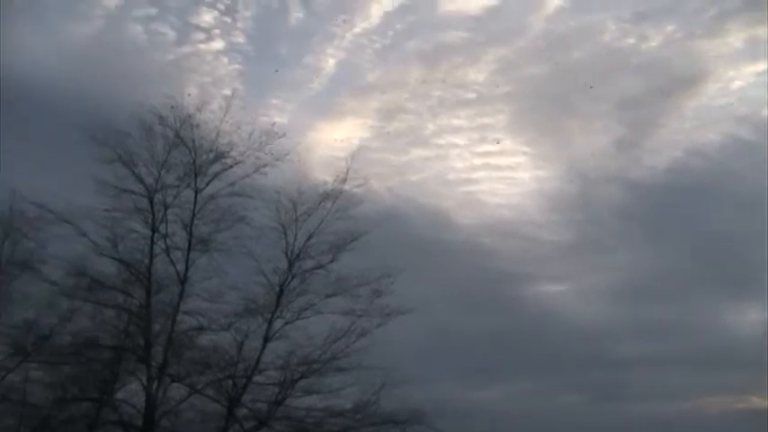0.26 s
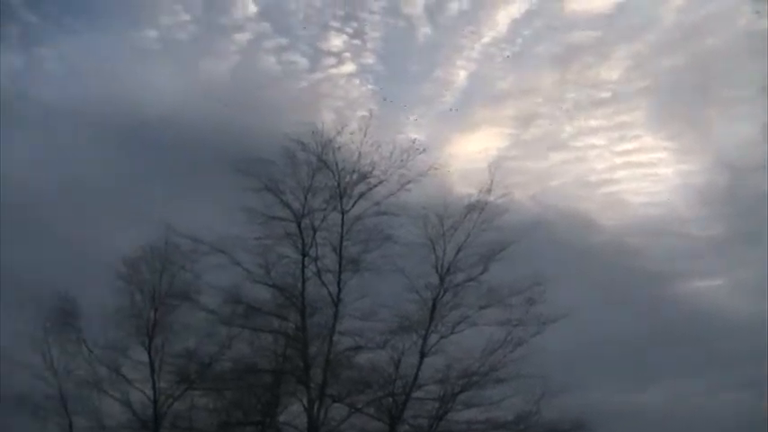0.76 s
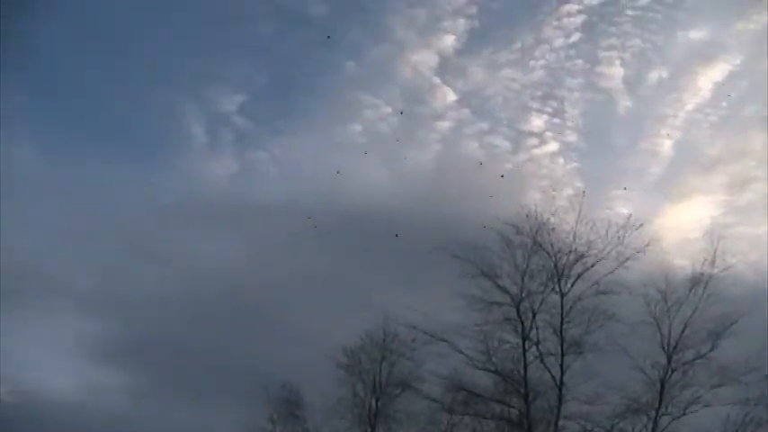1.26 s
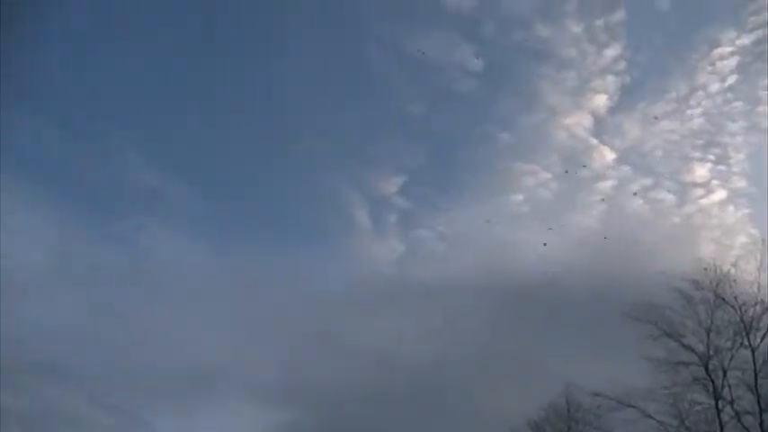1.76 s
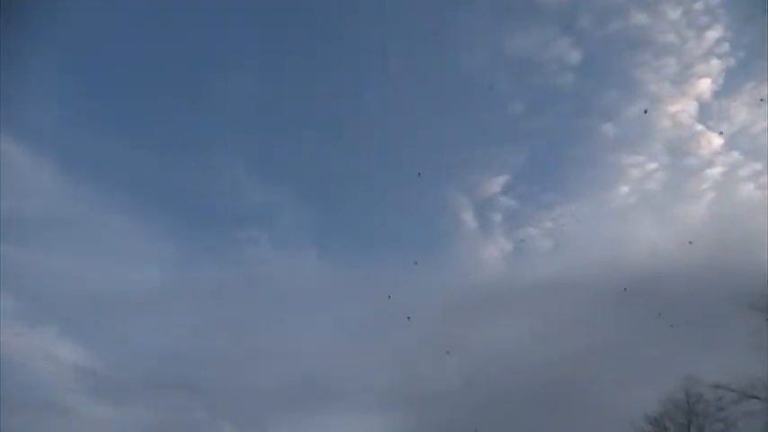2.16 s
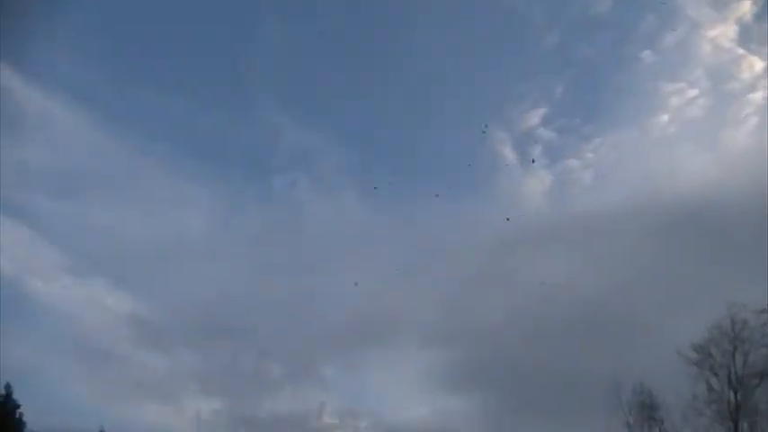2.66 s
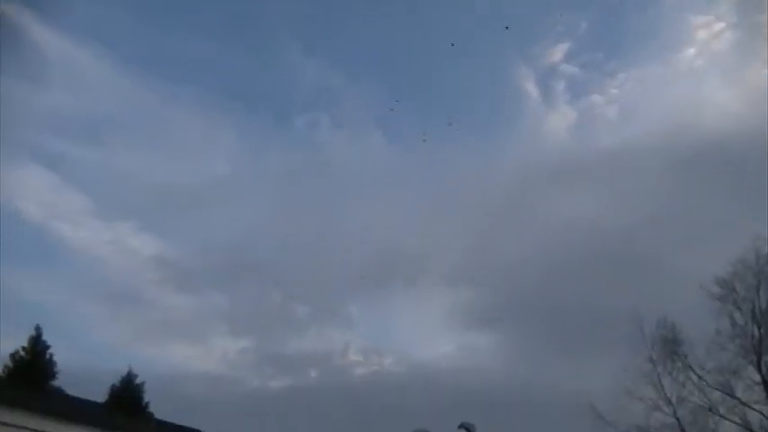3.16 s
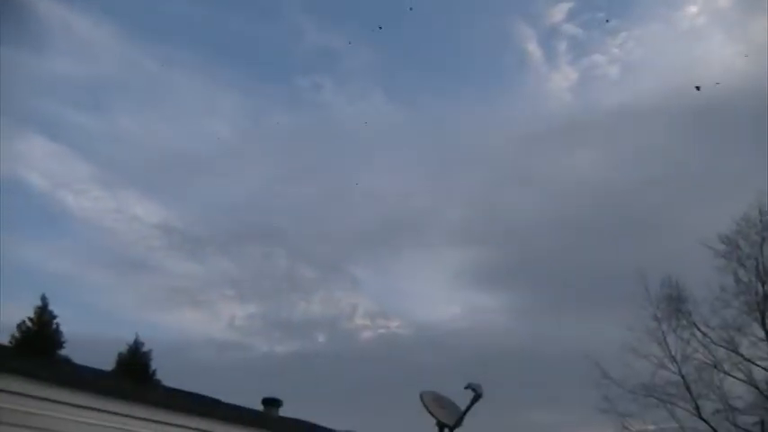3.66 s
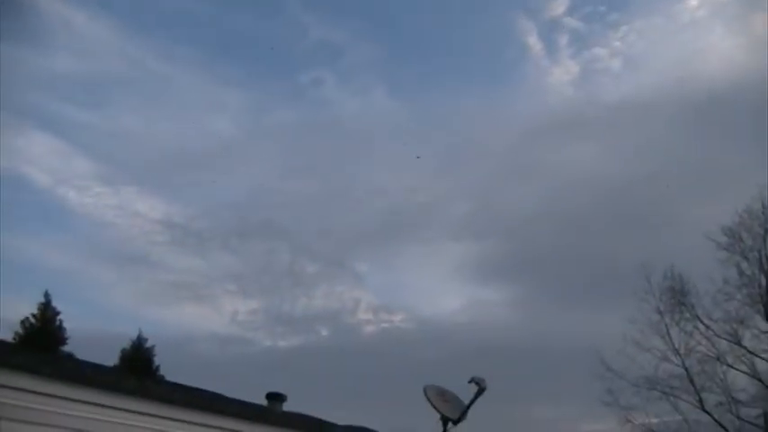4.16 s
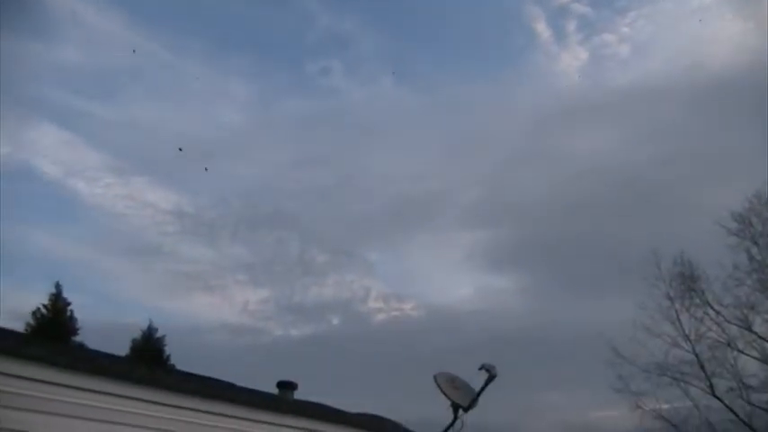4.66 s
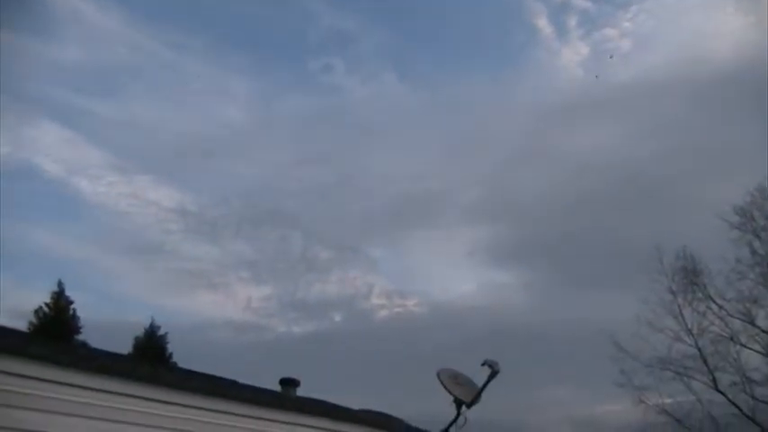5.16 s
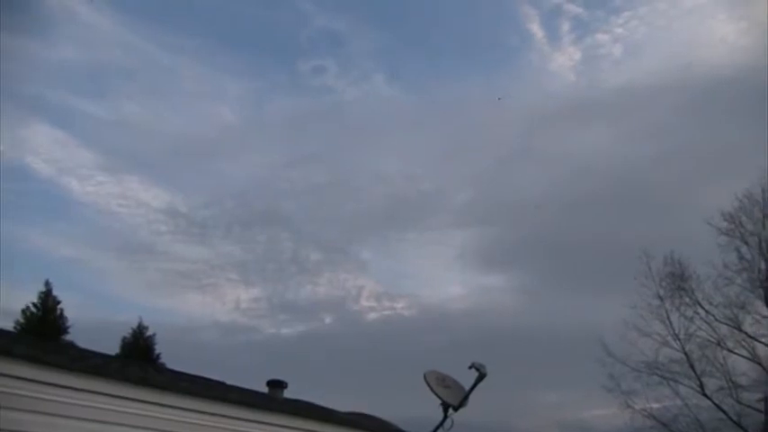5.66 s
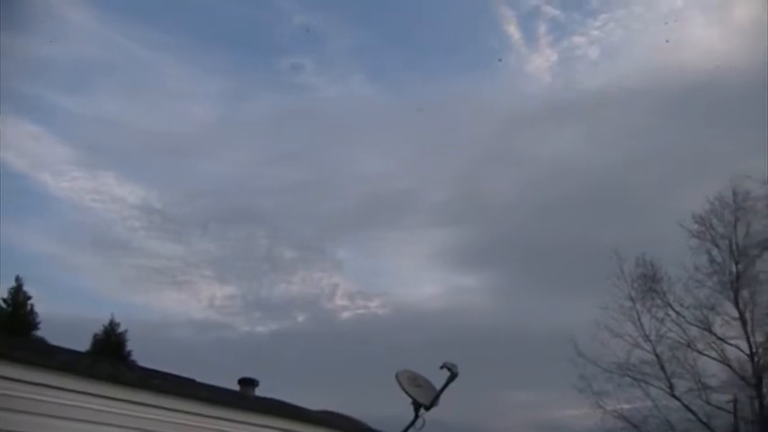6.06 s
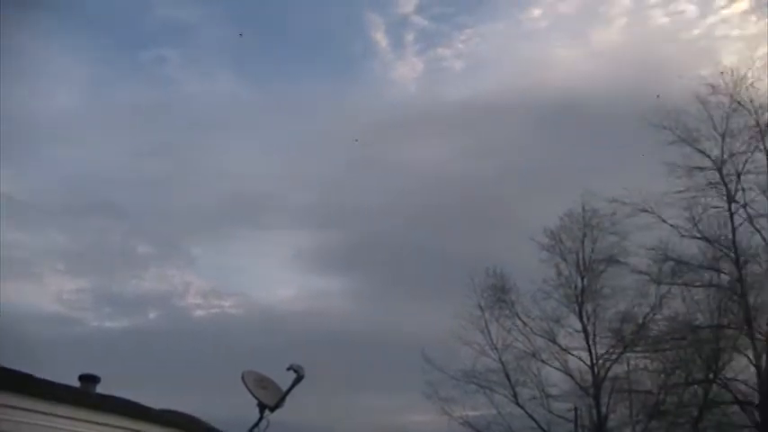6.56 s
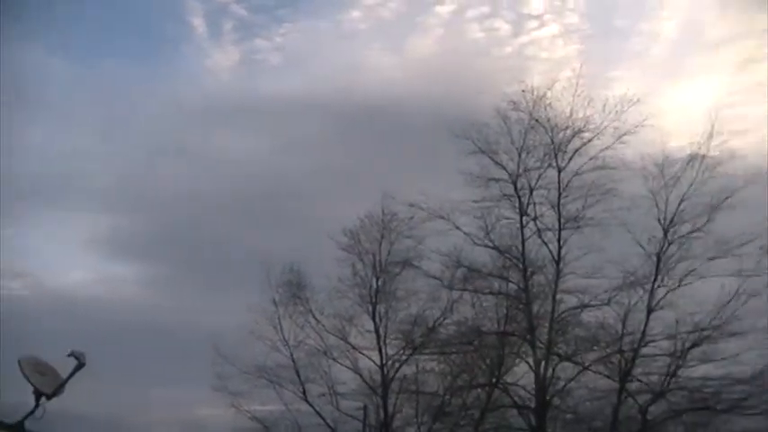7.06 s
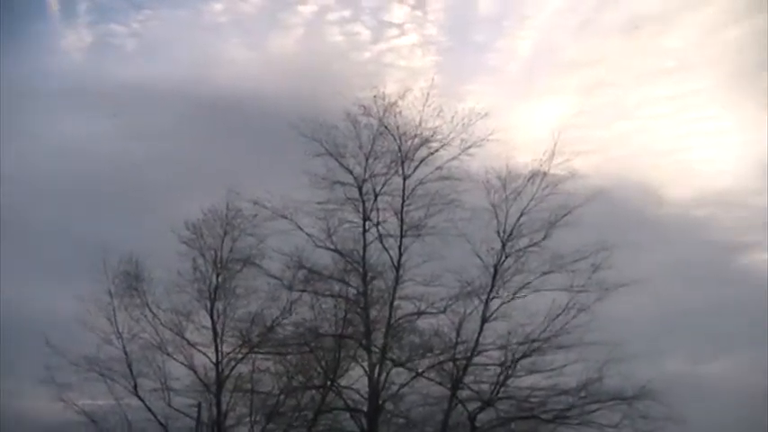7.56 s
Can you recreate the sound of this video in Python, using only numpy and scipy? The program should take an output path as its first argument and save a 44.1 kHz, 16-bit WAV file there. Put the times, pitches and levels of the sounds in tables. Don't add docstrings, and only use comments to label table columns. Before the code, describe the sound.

A big flock of small birds passes over gardens at dusk, already in full chatter. Distant voices blur into a constant bright bed, while nearer birds give quick sliding whistles and dry, throaty chacks on both sides. Breeze rustles low in a small stereo camera microphone; a faint engine drones by early. Hard gusts thud just after three seconds, then the wind eases and the birds continue to the end.

```python
import sys
import numpy as np
from scipy import signal
from scipy.io import wavfile

SR = 44100
rng = np.random.default_rng(int(sys.argv[2]) if len(sys.argv) > 2 else 0)


def store_pcm(level_fs):
    pcm = np.round(np.clip(level_fs, -1, 1) * 32767).astype(np.int16)
    wavfile.write(sys.argv[1], SR, np.atleast_2d(pcm).T)


def rack_gain(trim_db):
    fader = np.asarray(trim_db, float)
    return 10 ** (fader / 20)


N = 343977


def in_time(rows):
    s, *columns = np.transpose(rows)
    return [np.interp(np.arange(N) / SR, s, column) for column in columns]


def at_hz(points, hz):
    table_hz, values = np.transpose(points)
    return np.interp(np.log(hz), np.log(table_hz), values)


def rms_one(x):
    return x / np.sqrt(np.mean(x ** 2) + 1e-20)


def drift(rate_hz):
    r = np.exp(-40 * np.pi * rate_hz / SR)
    sparse = rng.standard_normal(N // 20 + 2002)
    slow = signal.lfilter([1], [1, -2 * r, r * r], sparse)[2000:]
    return np.interp(np.arange(N) / 20, np.arange(len(slow)), rms_one(slow))


def resonate(x, hz, width_hz):
    r = np.exp(-np.pi * width_hz / SR)
    poles = [1, -2 * r * np.cos(2 * np.pi * hz / SR), r * r]
    return signal.lfilter(np.array([1, 0, -1]) * (1 - r * r) / 2, poles, x)


def resonate_twice(x, hz, width_hz):
    return resonate(resonate(x, hz, width_hz), hz, width_hz)


def band_pass(x, low_hz, high_hz):
    return signal.sosfilt(signal.butter(2, [low_hz, high_hz], "band", fs=SR, output="sos"), x)


def add(out, s, sound, pan_db):
    lag = round(np.clip(pan_db / 4, -2, 2))
    for channel, side in enumerate((1, -1)):
        at = max(round(s * SR) + max(-side * lag, 0), 0)
        part = np.atleast_2d(sound)[-channel][:N - at]
        out[channel, at:at + len(part)] += part * rack_gain(side * pan_db / 2)


def bands(spectrum, edges, patchy_db, flicker_hz):
    white = rng.standard_normal((2, 2, N))
    for k, (low, high) in enumerate(zip(edges, edges[1:])):
        hz = np.sqrt(low * high)
        pair = band_pass(white[k % 2], low, high)
        yield hz, pair * rack_gain(at_hz(spectrum, hz) + patchy_db * drift(flicker_hz))


# t/s, level/dB
FLOCK_PASSING = [
    (0.0, -37.5),
    (0.19, -38),
    (0.35, -39),
    (0.89, -37),
    (1.26, -38.5),
    (5.15, -38),
    (5.47, -37),
    (7.47, -37.5),
    (7.8, -37),
]


def flock_loudness():
    return rack_gain(in_time(FLOCK_PASSING)[0])


# f/Hz, level/dB per Hz
CHATTER_COLOUR = [(210, -44), (350, -10), (620, -11.5), (1770, -9.5), (2990, -4), (3860, -0.5),
                  (4890, -4.5), (5830, -15.5), (7880, -26.5), (9690, -36), (11900, -32.5), (15600, -38)]
# f/Hz, likeness (-1 to 1)
PORT_LIKENESS = [(60, -0.36), (130, -0.44), (290, -0.31), (640, -0.29), (1410, 0.56), (3100, 0.42),
                 (6820, -0.24), (15000, 0.54)]


def chatter():
    out = 0
    edges = 330 * 2 ** np.arange(0, 5.8, .4)
    for hz, (mid, side) in bands(CHATTER_COLOUR, edges, patchy_db=2.0, flicker_hz=7.6):
        alike = np.clip(at_hz(PORT_LIKENESS, hz) - .03, -.95, .95)
        out = out + np.sqrt(1 + alike) * mid + np.sqrt(1 - alike) * side * [[1], [-1]]
    return rack_gain(-3.0) * flock_loudness() * rms_one(out)


def sing(s, hz, level_db, overtones, chance):
    breath_blur = .9
    buzz_hz, buzz_depth = 190, 0.45
    top_hz = 15750
    n = np.arange(len(hz))
    warble, flutter, rasp = chance[:, np.minimum(round(s * SR) + n + round(hz[0]), N - 1)]
    shrill = np.clip((hz[-1] - 5800) / 700, 0, 1)
    hz = hz * (1 + (.0065 + .005 * shrill) * warble)
    phase = 2 * np.pi * np.cumsum(hz) / SR
    tone = np.sin(phase)
    for k, db in overtones:
        partial = np.sin(k * phase + breath_blur * rasp)
        tone = tone + rack_gain(db + 2.6 * flutter) * partial * (k * hz < top_hz)
    tone = tone * (1 + buzz_depth * shrill * np.sin(2 * np.pi * buzz_hz * n / SR + warble))
    ends = np.clip(np.minimum(n, n[::-1]) / (0.007 * SR), 0, 1)
    return tone * ends * rack_gain(level_db + 3 + 3.2 * np.tanh(flutter))


# f/Hz, width/Hz, level/dB
THROAT_RESONANCES = [(3030, 2800, 5.5), (3900, 2020, -2.5), (3995, 2360, -3.5), (4100, 1100, -15.5)]
# f/Hz, width/Hz, level/dB
BEAK_RESONANCES = [(6230, 700, 10.5), (8297, 980, 5.5), (11450, 2700, 0.5)]


def chacks(rows, rasp_db, throat_db):
    ragged = rng.standard_normal(N) * rack_gain(2.5 * drift(350))
    throats = [rack_gain(db) * rms_one(resonate_twice(ragged, hz, width)) for hz, width, db in THROAT_RESONANCES]
    low, middle, top = [rack_gain(db) * resonate(ragged, hz, width) for hz, width, db in BEAK_RESONANCES]
    rasp = np.array([low - middle + top, low - middle - top])
    rasp = rms_one(band_pass(rasp, 6000, 12000))
    out, pans = np.zeros((2, N)), rng.normal(0, 2.5, len(rows))
    for k, (s, length, level_db, over_db) in enumerate(rows):
        u = np.linspace(0, 1, round(1.9 * length * SR))
        source = (k * 7919) % (N - len(u))
        piece = slice(source, source + len(u))
        voice = rack_gain(rasp_db) * rasp[:, piece]
        voice = voice + rack_gain(over_db + throat_db) * throats[k % len(throats)][piece]
        gate = np.sin(np.pi * u ** .55) ** 1.5
        add(out, s - .8 * length, voice * rack_gain(level_db) * gate, pans[k])
    return out


def far_whistles(count, chance):
    out = np.zeros((2, N))
    for moment, length, pitch, fall, level, pan in rng.random((count, 6)):
        s = moment * N / SR
        u = np.linspace(0, 1, round((.016 + .036 * length ** 3) * SR))
        end_hz = 2700 + 2050 * pitch
        start_hz = end_hz * (.87 + .31 * fall)
        hz = end_hz + (start_hz - end_hz) * (1 - u) ** 1.353
        level_db = -59 + 5 * level + 3 * pitch
        add(out, s, sing(s, hz, level_db, [], chance), 20 * (pan - .5))
    return out


def far_chacks(count):
    moment, length, level = rng.random((count, 3)).T
    throat_over_rasp_db = np.full(count, 24)
    rows = np.transpose([moment * N / SR, .012 + .025 * length, -74 + 4 * level, throat_over_rasp_db])
    return chacks(rows, rasp_db=-9.0, throat_db=-1.0)


# t/s, level/dB, left over right/dB
BREEZE = [(0, -49.5, -3), (.7, -46, -2.5), (1.5, -50.5, 0.5), (2.4, -48, 3.5), (2.9, -42.5, 1.5),
          (3.15, -40.5, 0.5), (3.7, -40.5, 3.5), (4.0, -45, 2.5), (4.7, -53.5, 0), (5.3, -48.5, 1),
          (6.1, -52, 0.5), (7.0, -56, 0.5), (7.8, -52.5, -1)]
# centre t/s, length/s, level over the breeze/dB
GUST_SWELLS = [(0.266, .3, 8), (0.953, 0.15, 7), (1.205, 0.092, 13.5), (1.359, 0.15, 12), (1.752, 0.1, 13),
               (1.945, 0.15, 13.5), (2.123, 0.21, 12), (2.598, 0.2, 4.5), (2.948, 0.075, 5.5),
               (3.203, 0.051, 9), (3.299, 0.1, 13.5), (3.432, 0.13, 14.5), (3.58, 0.13, 11.5),
               (3.835, 0.051, 8.5), (4.257, 0.16, 4.5), (4.501, 0.039, 23), (4.89, 0.178, 6),
               (5.537, 0.28, 9), (6.595, 0.91, 7), (7.053, 0.064, 13), (7.483, 0.17, 9.5)]
# f/Hz, level/dB per Hz
TURBULENCE = [(12, -40), (20, 4), (64, 4.5), (124, -1), (198, -10), (235, -6.5), (274, -24), (426, -49),
              (471, -26), (600, -42), (780, -72), (1320, -120)]
# t/s, share (0-1)
OPPOSED_PUSH = [
    (0, 0.71),
    (3.6, 0.7),
    (4.6, 0.54),
    (5, 0.058),
]


def wind():
    level_db, tilt_db = in_time(BREEZE)
    for s, length, over_db in GUST_SWELLS:
        level_db = level_db + over_db * np.exp(-(2 * (np.arange(N) / SR - s) / length) ** 2)
    edges = 18 * 2 ** np.arange(0, 5.1, .5)
    first, second = rms_one(sum(pair for hz, pair in bands(TURBULENCE, edges, 2.72, 12.2)))
    share = in_time(OPPOSED_PUSH)[0]
    left = rack_gain(level_db + tilt_db / 2 + 2.5) * first
    right = rack_gain(level_db - tilt_db / 2 + 3.0) * (np.sqrt(1 - share ** 2) * second - share * first)
    return rack_gain(1.67 * drift(13.0)) * np.array([left, right])


# centre t/s, length/s, rasp level/dB
DRY_CHACKS = [(0.08, 0.27, -58), (0.862, 0.021, -50), (1.179, 0.026, -56), (1.314, 0.0174, -64),
              (1.43, 0.053, -57), (1.75, 0.077, -52.5), (1.873, 0.0146, -51), (1.987, 0.017, -53),
              (2.229, 0.029, -57), (2.888, 0.025, -54.5), (4.371, 0.034, -53), (4.746, 0.057, -51),
              (6.071, 0.124, -58), (6.374, 0.032, -52.5), (6.903, 0.026, -53), (7.174, 0.064, -50.5),
              (7.398, 0.041, -52.5)]
# centre t/s, length/s, rasp level/dB, throat over rasp/dB
THROATY_CHACKS = [(.227, 0.04, -63, 27), (.362, .014, -55.5, 31.5), (.509, 0.036, -61.5, 23),
                  (.634, 0.094, -61, 18), (.778, 0.044, -49, 36), (.97, .11, -60, 27),
                  (1.532, 0.036, -59, 19.5), (2.143, 0.067, -52, 37), (2.467, 0.031, -58, 31),
                  (2.619, 0.039, -57, 37), (2.709, 0.0427, -63.5, 34.5), (3.078, 0.019, -65, 32),
                  (3.33, 0.038, -55, 25), (3.46, 0.066, -65, 29.5), (3.557, 0.04, -57, 27),
                  (3.779, 0.049, -55, 38), (3.891, 0.081, -68, 31.5), (4.013, 0.035, -58.5, 33.5),
                  (4.495, 0.046, -60.5, 37.5), (4.63, 0.046, -51, 42), (5.31, 0.046, -58, 41),
                  (5.582, 0.022, -54.5, 27), (5.715, 0.046, -48.5, 38), (5.777, 0.019, -54.5, 21),
                  (5.902, 0.059, -58.5, 29), (6.131, 0.096, -54, 36), (6.588, 0.098, -65, 36.5),
                  (6.705, 0.06, -52, 39), (7.563, 0.12, -57, 14), (7.785, 0.059, -49, 19)]
# centre t/s, length/s, rasp level/dB
BRIGHT_FLICKS = [(0.433, 0.023, -59), (.56, .04, -69), (.92, 0.0206, -65), (1.062, 0.014, -56),
                 (1.118, 0.015, -64), (1.676, 0.0224, -56), (2.01, 0.0227, -59), (2.097, 0.016, -62.5),
                 (2.592, .015, -66), (2.675, .018, -60), (2.845, .015, -56), (2.97, 0.021, -60),
                 (3.203, .02, -62), (3.688, 0.032, -55), (3.936, .015, -62), (4.413, .018, -64),
                 (4.533, .025, -55.5), (4.78, 0.028, -62), (5.02, .018, -61), (5.327, .02, -59),
                 (5.655, .015, -58), (6.564, 0.031, -54), (7.207, .02, -53)]


def near_chacks():
    dry_throat_db, flick_throat_db = 13, 16
    dry = [(*row, dry_throat_db) for row in DRY_CHACKS]
    flicks = [(*row, flick_throat_db) for row in BRIGHT_FLICKS]
    return chacks(sorted(THROATY_CHACKS + dry + flicks), rasp_db=0.73, throat_db=-12.0)


def glide(rows, shape, pan_db, chance, wander):
    octave_db, twelfth_db = -32, -35.5
    swell_db, swell_peak = 4.5, 0.48
    out = np.zeros((2, N))
    for (s, length, start_hz, other_hz, level_db), pan in zip(rows, pan_db + np.zeros(len(rows))):
        u = np.linspace(0, 1, round(length * SR))
        hz = other_hz + (start_hz - other_hz) * shape(1 - u)
        hz = hz * np.roll(wander, -round(s * SR + start_hz))[:len(u)]
        effort_db = 0.93 * (level_db + 42.5)
        bright_db = effort_db - 9 * (hz / 1000 - 4.5)
        overtones = [(2, octave_db + bright_db), (3, twelfth_db + bright_db)]
        loudness_db = level_db - swell_db * ((u - swell_peak) * 2) ** 2
        add(out, s, sing(s, hz, loudness_db, overtones, chance), pan)
    return out


# t/s, length/s, start f/Hz, end f/Hz, level/dB
LEFT_BIRDS = [(0.062, 0.14, 4900, 4170, -44), (0.07, 0.077, 4880, 5520, -47),
              (0.205, 0.16, 4512, 4095, -39.5), (.287, 0.065, 2124, 2170, -51.5),
              (0.885, 0.12, 5300, 3980, -43), (1.066, 0.15, 4705, 4240, -47.5),
              (1.79, 0.031, 3450, 3380, -41.5), (2.38, 0.16, 1907, 1980, -55.5),
              (2.425, 0.075, 4780, 4563, -45), (2.53, 0.1, 4670, 4420, -46), (2.91, 0.075, 4450, 4500, -52),
              (3.67, 0.08, 4220, 4130, -44.5), (4.098, 0.13, 4980, 5080, -54),
              (5.328, 0.018, 2620, 2936, -40), (5.99, 0.122, 4560, 4690, -41),
              (6.115, 0.12, 4540, 4514, -37.5), (6.49, 0.088, 5168, 4830, -44.5),
              (6.745, 0.075, 5150, 4326, -42), (6.85, 0.072, 4750, 4200, -52),
              (6.8, 0.077, 4780, 4950, -45), (6.8, 0.075, 4620, 4760, -50), (.61, .07, 5350, 5250, -54)]
# t/s, length/s, start f/Hz, end f/Hz, level/dB
RIGHT_BIRDS = [(0, 0.14, 3865, 3770, -45), (0.028, 0.081, 5060, 4850, -35), (1.19, .07, 4380, 4110, -47),
               (1.33, 0.11, 5050, 5450, -54), (2.695, 0.049, 4950, 5100, -42.5),
               (3.317, 0.046, 3650, 3880, -38.5), (3.363, 0.074, 4730, 4690, -45),
               (3.91, 0.1, 4200, 3900, -41.5), (4.99, 0.19, 4350, 3650, -48.5),
               (5.4, 0.086, 4000, 3840, -39), (5.57, 0.08, 4560, 4520, -45), (5.655, .05, 4500, 4458, -41),
               (5.4, .14, 4730, 4300, -48), (5.72, 0.12, 4060, 3590, -43), (5.885, 0.076, 4860, 4710, -39),
               (6.999, 0.14, 5800, 4578, -40), (7.185, 0.061, 5420, 5500, -46),
               (7.209, .085, 4140, 3800, -38.5), (7.414, 0.11, 4700, 4660, -46),
               (7.565, .25, 4590, 3504, -36)]


def sliding_calls(chance, wander):
    def sag(u):
        return u ** 1.5
    left = glide(LEFT_BIRDS, sag, 4, chance, wander)
    return left + glide(RIGHT_BIRDS, sag, -2, chance, wander)


# delay t/s, level/dB
ROOF_ECHOES = [(0.025, -12.5), (0.05, -11.5), (.095, -14.5)]


def outdoors(x):
    dull = signal.lfilter([.55], [1, -.45], x)[::-1]
    out = x
    for s, db in ROOF_ECHOES:
        out = out + rack_gain(db) * np.pad(dull, ((0, 0), (round(s * SR), 0)))[:, :N]
    return out


# t/s, length/s, start f/Hz, end f/Hz, level/dB
OVERHEAD_STRANDS = [(.128, 0.024, 5900, 5570, -45), (.243, 0.046, 5180, 4690, -39),
                    (.275, 0.025, 5200, 5140, -45), (.655, .022, 4000, 4000, -40.5),
                    (.91, .11, 5080, 4930, -52), (.955, 0.033, 3550, 3550, -45),
                    (1.038, 0.0213, 2900, 3350, -47), (1.455, .022, 3950, 3600, -42.5),
                    (1.615, 0.035, 5050, 4600, -56), (1.7, 0.039, 4100, 4400, -39),
                    (1.965, 0.027, 3800, 3910, -44), (2.13, 0.015, 4300, 5200, -46),
                    (2.225, 0.026, 3850, 4300, -47), (2.53, 0.11, 5150, 5090, -53),
                    (2.55, 0.043, 4400, 4340, -48), (2.99, 0.075, 3800, 3720, -49),
                    (3.74, 0.048, 4350, 3995, -44), (3.79, 0.037, 5150, 4930, -43),
                    (4.003, 0.019, 4900, 4680, -49), (4.595, 0.043, 3200, 5000, -46),
                    (4.695, .03, 4000, 5050, -42), (4.77, .022, 3300, 3790, -39.5),
                    (5.1, .1, 5650, 5630, -50), (5.2, 0.134, 4500, 4700, -49),
                    (5.3, 0.031, 4000, 4500, -42), (5.37, 0.021, 5380, 5223, -46),
                    (5.65, 0.037, 6350, 6300, -59), (6.19, .08, 4000, 3700, -46),
                    (6.365, 0.025, 3800, 3900, -39.5), (6.45, 0.043, 2750, 3230, -45),
                    (6.5, 0.044, 5650, 5720, -52), (6.975, 0.088, 5330, 5010, -43.5),
                    (7.183, 0.02, 4500, 5100, -39), (7.35, 0.073, 5070, 5220, -44),
                    (7.44, .06, 5050, 5040, -49), (7.51, 0.1, 4600, 4730, -47)]


def strands(chance, wander):
    return glide(OVERHEAD_STRANDS, lambda u: u, 0.5, chance, wander)


# t/s, length/s, start f/Hz, end f/Hz, level/dB
HOOKED = [
    (.138, .098, 5180, 4800, -39),
    (.285, 0.063, 4700, 4710, -40),
    (6.45, 0.13, 4330, 3850, -45),
    (7.615, .115, 5830, 4970, -42),
    (7.725, 0.078, 5750, 4790, -38.5),
]


def hooked_calls(chance, wander):
    return glide(HOOKED, lambda u: u ** 5.3, -1.5, chance, wander)


# t/s, length/s, f/Hz, level/dB, left over right/dB
SHRILL_NOTES = [(0.26, 0.048, 6820, -52, 2.5), (0.3, .05, 7340, -57, 3), (0.908, 0.054, 6720, -51, 3),
                (1.48, 0.033, 6550, -48, -1.5), (2.083, 0.06, 6650, -57, 1.9),
                (3.539, 0.078, 6420, -51, -.1), (4.002, 0.087, 6060, -52.5, 3.5),
                (4.146, 0.087, 6360, -55, 4), (5.16, 0.053, 6460, -46.5, -4), (6.068, 0.042, 5800, -46, -2),
                (6.156, .061, 7100, -53, 6), (6.462, 0.045, 6900, -52.5, 2.1), (6.694, .13, 6160, -51, -5),
                (6.817, 0.059, 5900, -52, -.4), (7.063, 0.037, 7120, -53, 12),
                (7.108, 0.088, 6050, -52, -9.5), (7.131, 0.09, 6600, -52, 6), (7.205, .05, 6940, -53, -.4),
                (7.396, 0.06, 6450, -42, -2)]


def shrill_notes(chance, wander):
    sag_hz_per_s = 2650
    rows = []
    for s, length, hz, level_db, pan_db in SHRILL_NOTES:
        half_sag = sag_hz_per_s * length / 2
        rows.append((s, length, hz + half_sag, hz - half_sag, level_db))
    return glide(rows, lambda u: u, np.array(SHRILL_NOTES)[:, -1], chance, wander)


def drone():
    start_s, length_s, level_db = 0.5, 2, -61.5
    u = np.clip((np.arange(N) / SR - start_s) / length_s, 0, 1)
    hum = rms_one(resonate_twice(rng.standard_normal(N), hz=315, width_hz=76))
    return rack_gain(level_db) * np.sin(np.pi * u) ** .5 * hum


# t/s, left peak level/dB, f/Hz, direction (sign and strength)
WIND_BUFFETS = [(3.281, -11, 123, -1.2), (3.426, -5.5, 114, -0.98), (3.477, -17, 110.6, 0.76),
                (3.508, -13, 126, -1.06), (3.557, -10, 85, 0.83), (3.644, -15, 90, -1.1),
                (4.498, -10.5, 161, 1), (4.284, -22.5, 114, -0.84), (3.179, -22, 120, -0.9),
                (3.22, -16.5, 113, 0.79), (4.513, -14, 124, 0.66), (5.312, -15.5, 115, 0.73)]


def buffets():
    out = np.zeros((2, N))
    for s, peak_db, hz, direction in WIND_BUFFETS:
        t = np.arange(N) / SR - s
        burst = np.exp(-(t * hz / .62) ** 2) * np.cos(2 * np.pi * hz * t - .9)
        out += direction * rack_gain(peak_db) * burst * [[1], [-.53]]
    return out


# t/s, length/s, edge f/Hz, top f/Hz, level/dB
ARCHED = [
    (6.57, 0.035, 6300, 6950, -47),
    (6.61, 0.18, 4760, 5320, -44.5),
    (6.885, 0.05, 6800, 7470, -62),
    (6.905, 0.09, 5270, 5380, -50),
    (7.275, 0.076, 4860, 5340, -47),
]


def arched_calls(chance, wander):
    return glide(ARCHED, lambda u: 1 - np.sin(np.pi * u), 0.5, chance, wander)


# t/s, f/Hz, level/dB
DOVE_COO = [
    (7.02, 575, -65),
    (7.12, 573, -53),
    (7.5, 568, -66),
]


def dove():
    hz, level_db = in_time(DOVE_COO)
    s = np.arange(N) / SR
    gate = np.clip(np.minimum(s - DOVE_COO[0][0], DOVE_COO[-1][0] - s) / 0.034, 0, 1)
    return gate * rack_gain(level_db + 1.0) * np.sin(2 * np.pi * np.cumsum(hz) / SR)


def scene():
    chance = np.array([drift(45), drift(70), drift(300)])
    wander = 1 + 0.004047 * drift(21.0)
    far = (far_whistles(2000, chance) + far_chacks(330)) * flock_loudness() * rack_gain(39)
    near = near_chacks()
    for calls in (sliding_calls, strands, hooked_calls, shrill_notes, arched_calls):
        near = near + calls(chance, wander)
    left, right = outdoors(near + far) + chatter()
    birds = np.array([np.roll(left, shift=1), right])
    return birds + wind() + buffets() + drone() + dove()


def roll_off(x):
    return signal.sosfilt(signal.butter(12, 15760, fs=SR, output="sos"), x)


def record(dry):
    thinned = signal.sosfilt(signal.butter(2, 40, "high", fs=SR, output="sos"), dry)
    rounded = .6 * np.tanh(thinned / .6)
    return roll_off(rounded)


dry = scene()
out = record(dry)
store_pcm(out)
```